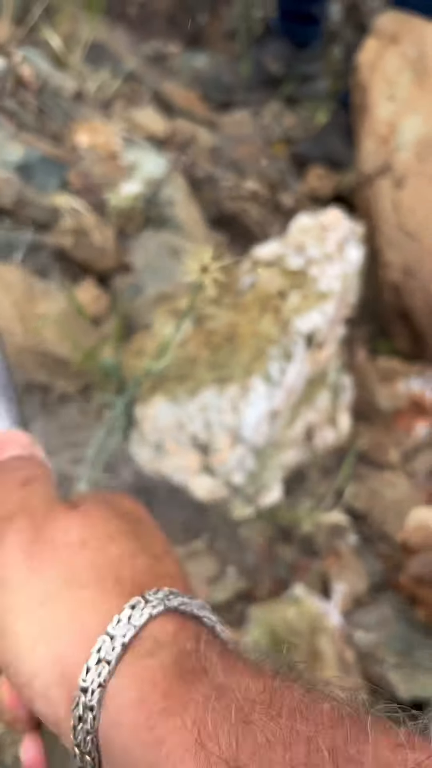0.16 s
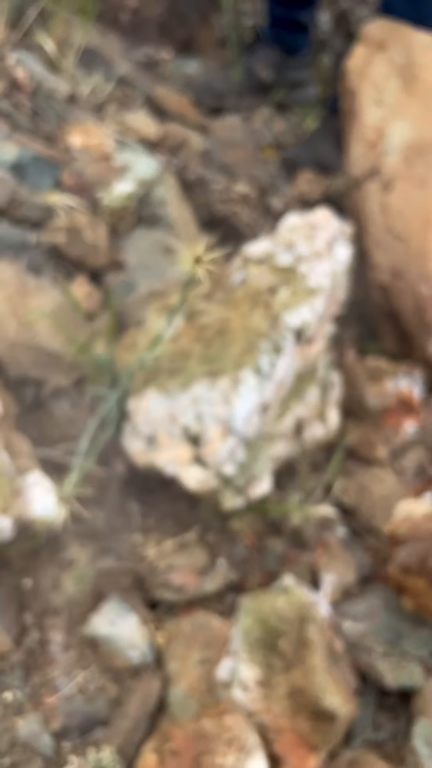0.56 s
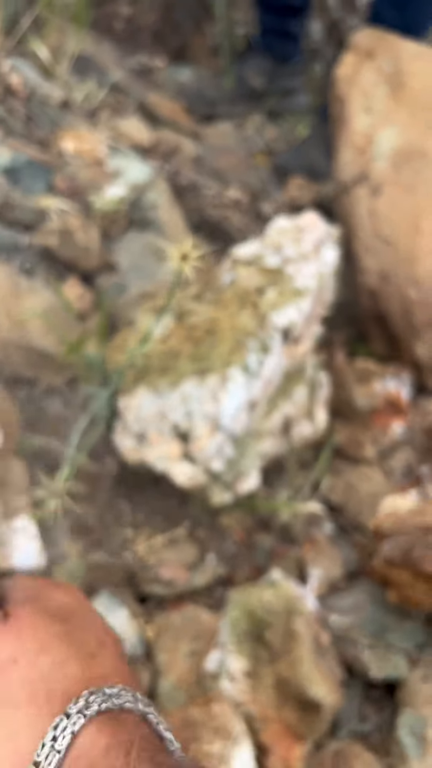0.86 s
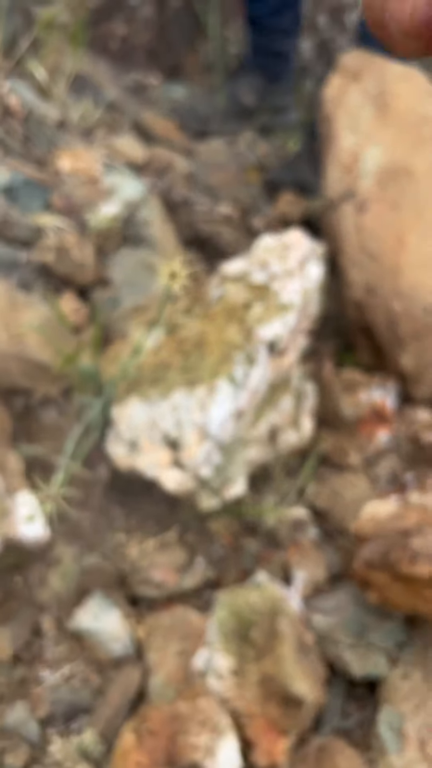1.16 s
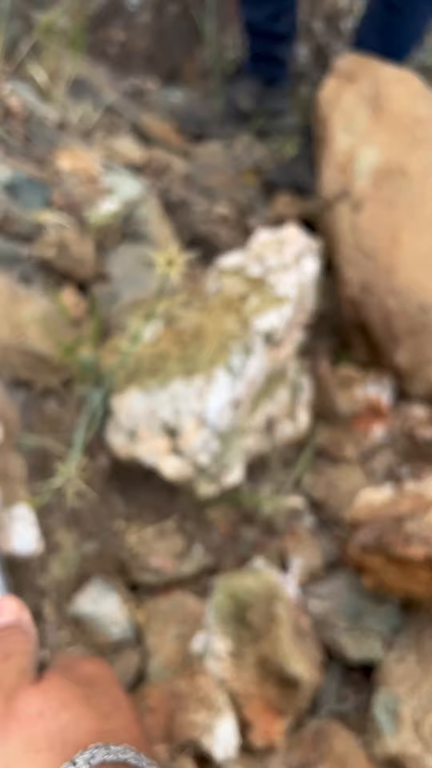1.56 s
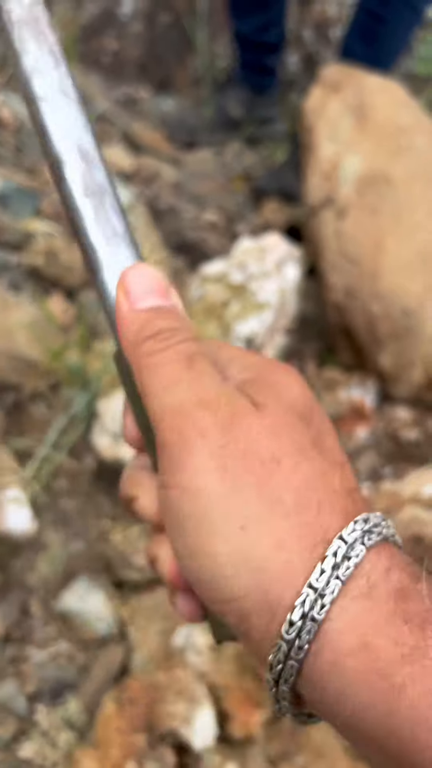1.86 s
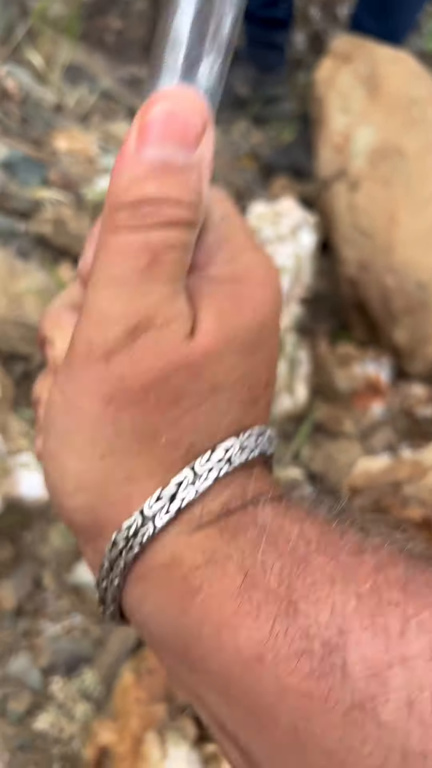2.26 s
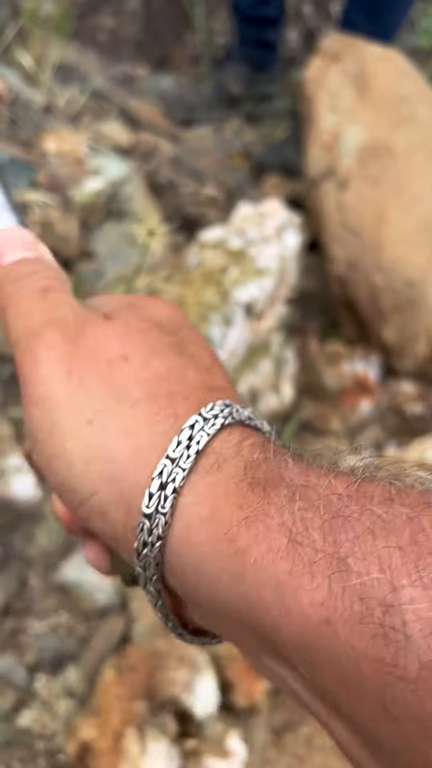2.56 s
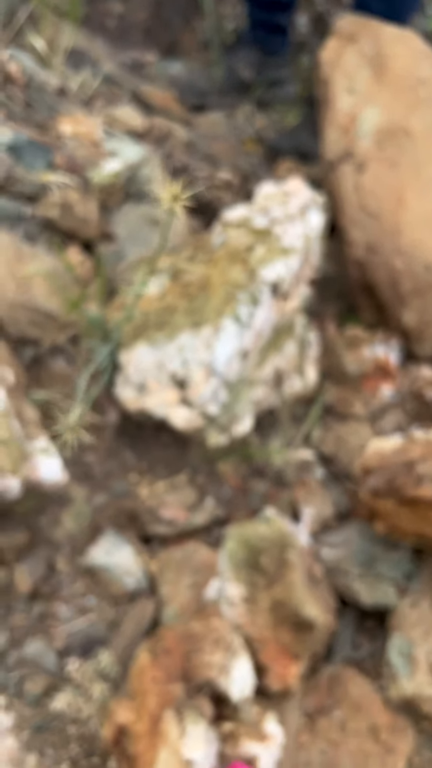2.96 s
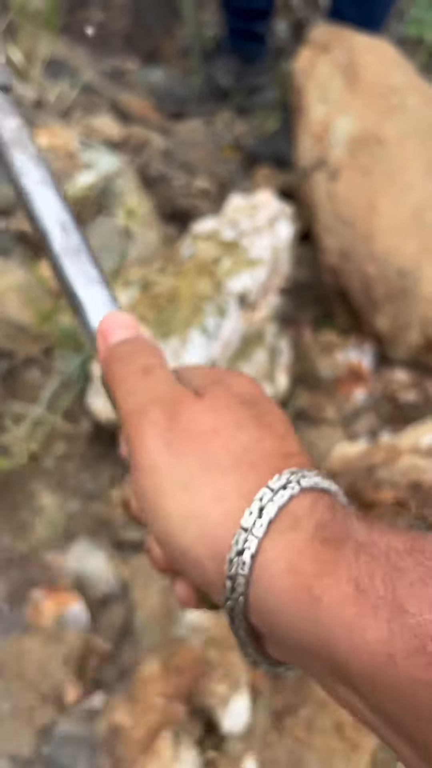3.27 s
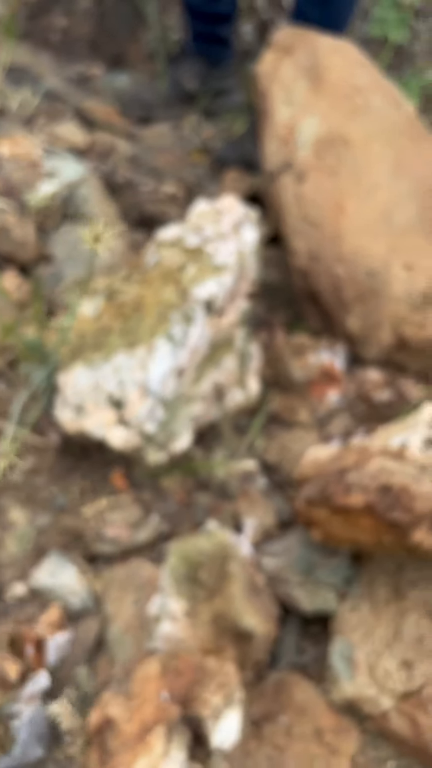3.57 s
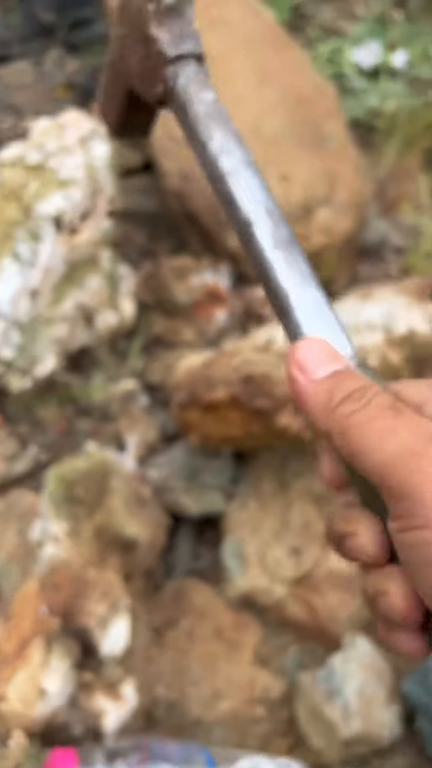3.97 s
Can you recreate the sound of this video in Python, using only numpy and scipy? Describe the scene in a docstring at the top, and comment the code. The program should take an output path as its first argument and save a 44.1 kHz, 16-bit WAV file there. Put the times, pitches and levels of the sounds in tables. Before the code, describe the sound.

A steel hammer cracks five times on hard rock, close up, each blow a doubled click with a brief ring, ending in a patter of stone chips.

```python
"""Hammer on a hillside rock

A steel hammer strikes a hard rock five times on an open hillside, close to the microphone.
Each blow is a tick and a crack of crushed stone, ringing steel, and a low thump as the rock shudders.
The rock knocks back into place, and stones settle. Every blow loosens gravel, built from tiny pitched grains;
after the last, many chips click and patter over the scree. Faint air hisses behind, made of coloured noise."""
import sys
import numpy as np
from scipy import signal
from scipy.fft import rfft, irfft, next_fast_len
from scipy.io import wavfile
from scipy.ndimage import uniform_filter1d

SR = 44100
rng = np.random.default_rng(int(sys.argv[2]) if len(sys.argv) > 2 else 0)


def log_audio(samples):
    """Write samples as a 16-bit WAV file to the path given in sys.argv[1]."""
    # one column per channel
    frames = np.atleast_2d(samples).T
    # limit to full scale, then quantise
    limited = np.clip(frames, -1, 1)
    pcm = np.round(limited * 32767).astype(np.int16)
    wavfile.write(sys.argv[1], SR, pcm)


N = 181692  # length in samples

CLANK_HZ, CLANK_WIDTH_HZ = 3580, 300  # head resonance; its strength depends on how squarely the blow lands
BODY_HZ, BODY_WIDTH_HZ = 480, 450  # hollow note of the rock; its strength depends on where the blow lands
LEAD_S = 0.0092  # the tick comes this long before the crack
MODES_OVER_THUMP_DB = 12  # the heavier the blow, the louder the short modes
SPRAY_UNDER_CRACK_DB = -32
KNOCK_UNDER_SHUDDER_DB = -3.5  # the harder the rock shakes, the harder it drops back

# The five blows; levels are relative, each layer adds its own gain:
# (time [s], crack level [dB], light tick level [dB], steel ring level [dB], ring hold [s],
#  thump level [dB], shudder level [dB], clank of the head [dB], hollow body [dB],
#  delay until the rock drops back [s], loosened gravel level [dB])
BLOWS = [(0.1167, -1.5, -8.5, -24, 0.05, -8.5, -20, 17, 6, 0.095, -71),
         (0.786, -4.5, -22, -36, 0.022, -18.5, -27.5, 16, -5.5, 0.087, -72.5),
         (1.5297, -3.5, -19, -38.5, 0.014, -12, -19.5, 3.5, 1, 0.085, -78),
         (2.3307, -3.5, -18.5, -30, 0.0094, -13, -22, 17, -10, .086, -75),
         (3.0788, -2.5, -15, -33, 0.0023, -18, -29, 25.5, 7, 0.093, -55.5)]


def hammer(thump_lag=0.004, rumble_lag=0.037, tick_ring=1.7):
    """Each blow ticks, cracks and rings; the ground answers low, and the rock drops back."""
    out = np.zeros((2, N))
    long_t = np.arange(SR) / SR
    t = long_t[:16384]
    for (s, crack_db, tick_db, ring_db, hold, thump_db, shudder_db,
         clank_db, body_db, drop_s, _) in BLOWS:
        accents = [(CLANK_HZ, CLANK_WIDTH_HZ, clank_db), (BODY_HZ, BODY_WIDTH_HZ, body_db)]
        # Soft tick ahead
        add(out, s - LEAD_S, amp(tick_db) * tick(accents))
        add(out, s - LEAD_S, amp(tick_db) * tick_ring * modes(t))
        add(out, s - LEAD_S, amp(tick_db + clank_db) * clang(t))
        # Loud crack
        add(out, s, amp(crack_db) * crack(accents))
        add(out, s, amp(crack_db) * skid(accents))
        add(out, s, amp(thump_db + MODES_OVER_THUMP_DB) * modes(t))
        add(out, s, amp(ring_db) * ring(t, hold))
        add(out, s, amp(crack_db + SPRAY_UNDER_CRACK_DB) * spray(t))
        # Answer of the ground
        add(out, s + thump_lag, thump(t, thump_db, shudder_db))
        add(out, s + rumble_lag, rumble(long_t))
        add(out, s + drop_s, knock(shudder_db + KNOCK_UNDER_SHUDDER_DB))
    return out


# Basic tone colour of the crack and the tick: (frequency [Hz], level [dB])
CRACK_COLOUR = [(60, -12), (160, -6.5), (300, -2), (550, -12), (900, -3), (1500, -1.5), (2200, -3.5),
                (2800, -9.5), (4400, -15), (6000, -15), (9000, -22), (13000, -22), (16000, -39)]
# Broad resonances that colour both: (frequency [Hz], width [Hz], boost [dB])
CRACK_RESONANCES = [(1810, 130, 7), (4320, 480, 5)]


def crack(accents, bright_db=-0.28, crack_db=14.5, crush_s=0.002):
    """Steel crushes the stone surface for a few milliseconds."""
    sound = click(CRACK_COLOUR, bright_db, crush_s, 5500, CRACK_RESONANCES + accents)
    return amp(crack_db) * ports(sound)


def tick(accents, bright_db=-0.4, tick_db=14, crush_s=0.003):
    """A lighter, scratchier tick makes each blow sound doubled."""
    sound = click(CRACK_COLOUR, bright_db, crush_s, 2600, CRACK_RESONANCES + accents)
    return amp(tick_db) * ports(sound)


def skid(accents, count=3, first_s=.0006, last_s=0.0036, level_db=-9, fall_db_per_s=1500):
    """The face skids on the rough stone and bites again a few times within milliseconds."""
    out = np.zeros((2, SR // 8))
    for k, when in enumerate(rng.random(count)):
        late = first_s + (last_s - first_s) * (k + when) / count
        add(out, late, amp(level_db - fall_db_per_s * late) * crack(accents))
    return out


def clang(t, head_db=-30, head_t60=.04, gap=-1.3):
    """A short steely ring starts with the tick, just ahead of the crack."""
    lead = np.array([[gap], [0]])  # radians, left and right
    level = amp(head_db - 60 * t / head_t60) * (1 - np.exp(-t / 0.00084))
    return level * np.sin(2 * np.pi * CLANK_HZ * t + lead)


# Short notes of hammer head and rock:
# (frequency [Hz], relative level [dB], time to fall by 60 dB [s], left-right phase [rad])
MODES = [(1060, -33.5, .07, -3), (1560, -36, .06, -0.58), (1670, -27.5, .05, -1.35), (1742, -20, .03, 0),
         (3290, -32.5, 0.057, -1.47), (3890, -29.5, 0.035, -0.2), (3750, -36.5, .1, -1),
         (4230, -26, .04, 0), (6040, -38.5, 0.14, 3), (8250, -48.5, 0.096, 1), (9960, -26.5, 0.046, -2.5),
         (11887, -37.5, 0.035, -1.5)]


def modes(t):
    """Hammer head and rock ring in short notes that are not multiples of one another."""
    side = np.array([[.5], [-.5]])
    total = 0
    for hz, db, t60, gap in MODES:
        phase = rng.uniform(0, 2 * np.pi) + side * gap
        total = total + amp(db - 60 * t / t60) * np.sin(2 * np.pi * hz * t + phase)
    return total


def ring(t, hold, ring_hz=4008, t60=.16, swell_s=0.015, gap=-1.1, twin_hz=3993, twin=0.11):
    """The long steel note, a close pair of modes, swells, holds, and is damped by the hand."""
    fade_db = -60 * (np.hypot(t, hold) - hold) / t60  # nearly flat at first, then steady decay
    lead = np.array([[gap], [0]])
    main = np.sin(2 * np.pi * ring_hz * t + lead)
    second = np.sin(2 * np.pi * twin_hz * t + lead + rng.uniform(0, 2 * np.pi))
    return amp(fade_db) * (1 - np.exp(-t / swell_s)) * (main + twin * second)


# Tone colour of the grit spray: (frequency [Hz], level [dB])
SPRAY_COLOUR = [(100, 5.5), (250, 1), (600, 1.5), (1700, -4), (2600, -15.5), (3700, -2.5), (5200, -14.5),
                (8000, -17.5), (11000, -25), (12700, -15), (16000, -31.5)]


def spray(t, t60=.115, apart=0.12, lumpy_db=5.5):
    """Grit and scatter from the nearby stones fade unevenly just after the crack."""
    lumps = unit(uniform_filter1d(rng.standard_normal(len(t)), size=120))
    level = amp(lumpy_db * lumps - 60 * t / t60) * (1 - np.exp(-t / 0.00033))
    return wide(SPRAY_COLOUR, len(t), apart) * level


def thump(t, db, shudder_db, low_hz=56, start_hz=38, sag_s=0.011, t60=0.062, rise_s=0.0037,
          settle_s=0.085, shudder_hz=57, build_s=0.031):
    """The rock is driven into its bed with a falling low note, then shudders until it settles."""
    turns = np.cumsum(low_hz + start_hz * np.exp(-t / sag_s)) / SR  # starts at the sum of both pitches
    push = 2 * amp(db - 60 * t / t60) * (1 - np.exp(-t / rise_s)) * np.sin(2 * np.pi * turns)
    window = (1 - np.exp(-(t / build_s) ** 2)) * np.exp(-(t / settle_s) ** 6)
    shudder = amp(shudder_db) * window * np.sin(2 * np.pi * shudder_hz * t + 2.3)
    return push + shudder


def rumble(t, hz=46.4, beat_hz=3.55, db=-22, t60=0.74):
    """A deep beating after-sound follows each blow."""
    beat = np.sin(np.pi * beat_hz * t)
    return amp(db - 60 * t / t60) * beat * np.sin(2 * np.pi * hz * t)


def knock(db, t60=0.03, rise_s=0.002, glide_s=0.0025, first_hz=370, light_hz=240, heavy_hz=113,
          thud_hz=65, thud=0.67, level_db=3):
    """A dull knock drops in pitch as the stone presses into soil; a heavy one sinks lower and thuds."""
    t = np.arange(SR // 4) / SR
    light_db, heavy_db, thud_t60 = -38, -36.5, .11
    heft = np.clip((db - light_db) / (heavy_db - light_db), 0, 1)  # 0 light, 1 heavy
    last_hz = light_hz + heft * (heavy_hz - light_hz)
    turns = np.cumsum(last_hz + (first_hz - last_hz) * np.exp(-t / glide_s)) / SR
    note = -np.sin(2 * np.pi * turns) * amp(-60 * t / t60)
    low_thud = heft * thud * np.sin(2 * np.pi * thud_hz * t) * amp(-60 * t / thud_t60)
    return amp(db + level_db) * (note + low_thud) * (1 - np.exp(-(t / rise_s) ** 2))


# Later dull knocks: the rock settling again after blows two to four, then stones landing in the slide; knock()
# adds its own gain: (time [s], level [dB])
LATER_KNOCKS = [(1.0617, -38), (1.748, -38), (2.594, -43.5), (3.2648, -35), (3.2971, -35), (3.352, -53),
                (3.397, -39), (3.547, -45)]


def knocks():
    """The rock settles again with a softer knock, and stones land with dull knocks, a moment after the blows."""
    out = np.zeros((2, N))
    for s, db in LATER_KNOCKS:
        add(out, s, knock(db))
    return out


# The largest chips landing; chip() adds its own gain and shapes the treble:
# (time [s], level [dB], pitch [Hz], relative treble [dB])
LANDING_CHIPS = [(0.323, -51.5, 1970, -10), (0.8234, -22.5, 1300, -10.5), (1.1, -48.5, 1370, -11),
                 (1.555, -20, 1630, -28), (1.568, -30.5, 3600, -7.5), (1.972, -47.5, 5940, 2),
                 (2.657, -56.5, 1995, -2), (3.1042, -23.5, 1700, -21), (3.194, -31.5, 2160, -7),
                 (3.214, -32, 1090, -23), (3.228, -28, 1160, -14), (3.237, -30, 870, -34),
                 (3.263, -20, 3550, -3), (3.279, -30, 2210, -4), (3.297, -27.5, 1960, 1.5),
                 (3.305, -31.5, 2280, -4.5), (3.321, -36, 1530, -9), (3.3472, -37, 1660, -21),
                 (3.3948, -31, 1290, -7), (3.414, -30.5, 1970, -4), (3.459, -34, 1480, -10.5),
                 (3.72, -46.5, 1188, -3.5), (3.774, -33, 1155, -1), (3.887, -45, 4730, 0.5),
                 (3.984, -42.5, 2370, -4.5)]


def chips():
    """The largest chips land one by one, each with its own click."""
    out = np.zeros((2, N))
    for s, db, hz, treble_db in LANDING_CHIPS:
        add(out, s, chip(db, hz, treble_db))
    return out


def chip(db, hz, treble_db, level_db=9, bass_db=-13, crush_s=.0014, clack_db=9, clack_width=0.15):
    """A chip clicks with one broad resonance set by its size."""
    spectrum = [(60, bass_db), (hz / 2, bass_db + 9.5), (hz, -3),
                (hz * 2, treble_db - 1.0), (16000, 2 * treble_db - 2.5)]
    resonance = [(hz, clack_width * hz, clack_db)]
    return amp(db + level_db) * ports(click(spectrum, 0, crush_s, 3100, resonance))


def pebbles(blows, count, first_s, last_s, over_gravel_db, spread_db, low_hz, high_hz, treble_db):
    """Small pebbles bounce at random among the gravel of each blow, and weaken as it does."""
    out = np.zeros((2, N))
    for s, *_, gravel_db in blows:
        for k, (when, size, pitch) in enumerate(rng.random((count, 3))):
            age = first_s + (last_s - first_s) * (k + when) / count
            db = gravel_db + slide_db(age) + over_gravel_db - spread_db * size
            hz = low_hz * (high_hz / low_hz) ** pitch
            add(out, s + age, chip(db, hz, treble_db))
    return out


# Tone colour of the gravel: (frequency [Hz], level [dB])
GRAVEL_COLOUR = [(80, 2.5), (250, 10.5), (600, -3.5), (1400, -4), (3000, -4), (5000, -11.5), (8000, -5.5),
                 (12000, -11.5), (16000, -20)]


def gravel():
    """Tiny grains of many sizes, each with a brief pitch, trickle down the scree over a soft wash."""
    per_s, spread_db, cycles, wash = 1300, 4.5, 2.5, .4
    pitches, t = np.geomspace(250, 14000, 28), np.arange(1500) / SR
    grains = np.zeros(N)
    for hz in pitches:
        # Small, high grains are commoner
        count = int(per_s * N / SR * np.sqrt(hz) / np.sqrt(pitches).sum())
        strength = amp(spread_db * np.minimum(rng.exponential(1, count), 3))
        falls = np.zeros(N)
        falls[rng.integers(0, N, count)] = strength * rng.choice([-1, 1], count)
        grain = np.sin(2 * np.pi * hz * t) * np.exp(-hz * t / cycles)
        grains += np.sqrt(hz) * unit(signal.oaconvolve(falls, grain)[:N])
    time = np.arange(N) / SR
    slides = [amp(gravel_db + slide_db(time - s)) for s, *_, gravel_db in BLOWS]
    level = np.max(slides, axis=0)  # the loudest slide wins
    return (ports(colour(grains, GRAVEL_COLOUR)) + wash * wide(GRAVEL_COLOUR, N, apart=1.0)) * level


def slide_db(age):
    """Gravel starts after a blow, gathers, runs, then dies away to a slow trickle; returns dB."""
    delay_s, rise_s, hold_s = 0.068, 0.065, 0.24  # the hold is counted from the blow
    fall_db_per_s, trickle_db, trickle_fall_db_per_s = 76, -16, 9.5
    rise = np.clip((age - delay_s) / rise_s, 1e-3, 1)
    late = np.maximum(age - hold_s, 0)
    slide = amp(-fall_db_per_s * late)
    trickle = amp(trickle_db - trickle_fall_db_per_s * late)
    return 20 * np.log10(rise ** 2 * (slide + trickle))


# Background air before the gain of air(): (time [s], level [dB])
AIR_LEVEL = [(0.0, -79.5), (0.69, -71.5), (1.05, -83.5), (1.6, -72), (1.76, -94.5), (2.06, -82),
             (2.24, -78.5), (2.45, -74), (2.64, -89), (3.03, -85), (3.7, -81.5), (3.754, -86), (4.12, -69)]
# Tone colour of the air: (frequency [Hz], level [dB])
AIR_COLOUR = [(50, -8.5), (100, 2.5), (170, -16), (350, -4.5), (600, -14.5), (1000, -20), (2000, -25.5),
              (2750, -20.5), (3300, -24.5), (4200, -13.5), (5200, -26.5), (9000, -28), (12000, -29.5),
              (16000, -40.5)]


def air(apart=1.0, level_db=5.5):
    """Faint outdoor hiss, made of coloured noise, swells and sinks."""
    level = level_db + np.interp(np.arange(N) / SR, *np.transpose(AIR_LEVEL))
    return wide(AIR_COLOUR, N, apart) * amp(level)


def click(spectrum, tilt_db, crush_s, gritty_hz, body, slow_s=.0011, slow_hz=1400, size=4096):
    """A contact: one push below gritty_hz, a short burst of crushing grains above it; energy 1."""
    hz, t = np.fft.rfftfreq(size, 1 / SR), np.arange(size) / SR
    peaks_db = sum(db / (1 + (2 * (hz - f) / width) ** 2) for f, width, db in body)
    tilt = tilt_db * np.log2((hz + 100) / 2000)
    log_gain = np.log(amp(read(spectrum, hz) + peaks_db + tilt))
    # Minimum phase: the response begins at the contact, never before it
    mirrored = np.r_[log_gain, log_gain[-2:0:-1]]
    causal = np.exp(np.conj(signal.hilbert(mirrored)))[:len(hz)]
    lag_s = slow_s * np.exp(-hz / slow_hz)  # low notes build up a little later
    shape = irfft(causal * np.exp(-2j * np.pi * np.cumsum(lag_s) * hz[1]))
    grains = rng.standard_normal(size) * np.sqrt(t) * np.exp(-t / crush_s)
    grains = grains / np.linalg.norm(grains)
    force = signal.lfilter(*signal.butter(2, gritty_hz, "high", fs=SR), grains)
    force += signal.lfilter(*signal.butter(2, gritty_hz, fs=SR), signal.unit_impulse(size))
    sound = signal.fftconvolve(force, shape[:size // 2])[:size]
    return sound / np.linalg.norm(sound)


def wide(spectrum, size, apart, from_hz=400):
    """Coloured noise whose bass is mostly shared by both ports and whose treble partly differs."""
    shared, left, right = (colour(rng.standard_normal(size), spectrum) for _ in range(3))
    highpass = signal.butter(1, from_hz, "high", fs=SR)
    return ports(shared) + apart * signal.lfilter(*highpass, [left, right])


# Phase gap between the two microphone ports: (frequency [Hz], lead of the left [rad])
PORT_PHASE = [(300, 0), (1000, .1), (2000, -.2), (3600, -1.35), (5500, -1.1), (9000, -1.1), (12500, -2.7),
              (16000, -2.8)]


def ports(x):
    """Two microphone ports hear the same sound with a phase gap that varies with frequency."""
    size = 2 * next_fast_len(len(x))
    turn = np.exp(.5j * read(PORT_PHASE, np.fft.rfftfreq(size, 1 / SR)))
    return irfft(rfft(x, size) * np.array([turn, 1 / turn]))[:, :len(x)]


def colour(x, spectrum):
    """Filters a sound by a spectrum, to rms 1."""
    size = next_fast_len(len(x))
    gain = amp(read(spectrum, np.fft.rfftfreq(size, 1 / SR)))
    return unit(irfft(rfft(x, size) * gain, size)[:len(x)])


def read(points, hz):
    """Joins points by straight lines on a log-frequency axis."""
    f, value = np.transpose(points)
    return np.interp(np.log(hz + 1), np.log(f + 1), value)


def amp(db):
    """Turns decibels into a plain factor."""
    return 10 ** (np.asarray(db) / 20)


def unit(x):
    """Scales a sound to rms 1."""
    return x / np.sqrt(np.mean(x ** 2) + 1e-20)


def add(mix, s, sound):
    """Adds a sound to the mix at s seconds, cut off at the end of the mix."""
    part = mix[:, round(s * SR):][:, :sound.shape[-1]]
    part += sound[..., :part.shape[1]]


def scene():
    """Sums the blows, falling stones, gravel and air."""
    strays = pebbles(BLOWS[:-1], count=3, first_s=0.24, last_s=.5, over_gravel_db=25.5,
                     spread_db=0.5, low_hz=1170, high_hz=7200, treble_db=7.5)
    shower = pebbles(BLOWS[-1:], count=14, first_s=.11, last_s=0.18, over_gravel_db=10,
                     spread_db=14, low_hz=810, high_hz=3530, treble_db=-9.5)
    return hammer() + knocks() + chips() + strays + shower + gravel() + air()


def record(dry):
    """The loudest peaks are rounded off; then a low-pass filter limits the band."""
    ceiling, edge_hz = .9, 16500
    held = dry / (1 + (dry / ceiling) ** 6) ** (1 / 6)
    lowpass = signal.firwin(511, edge_hz, window=("kaiser", 9), fs=SR)
    return signal.oaconvolve(held, lowpass[None], "same")


dry = scene()
out = record(dry)
log_audio(out)
```